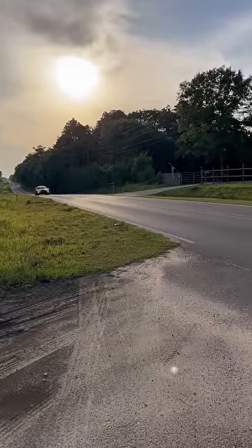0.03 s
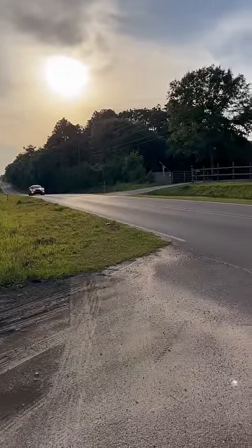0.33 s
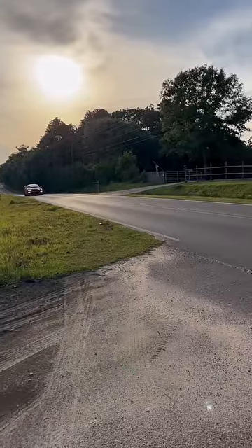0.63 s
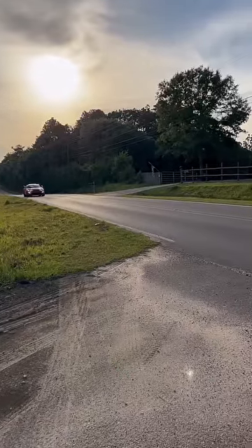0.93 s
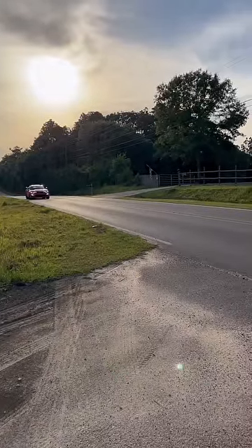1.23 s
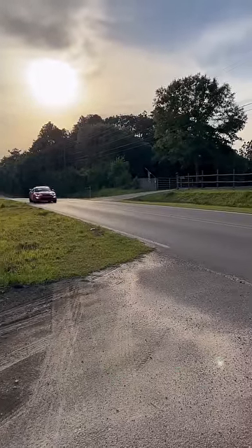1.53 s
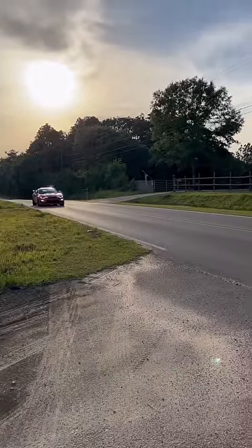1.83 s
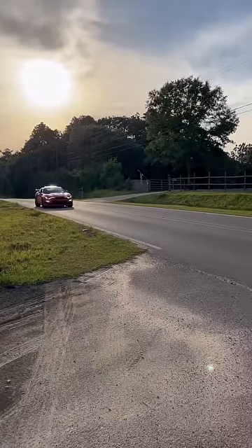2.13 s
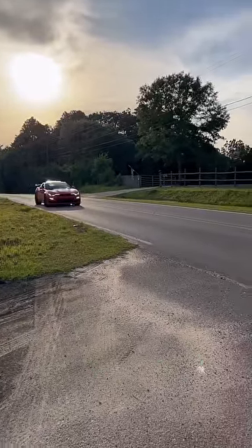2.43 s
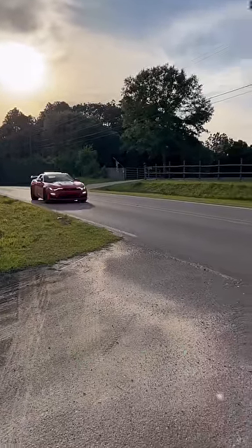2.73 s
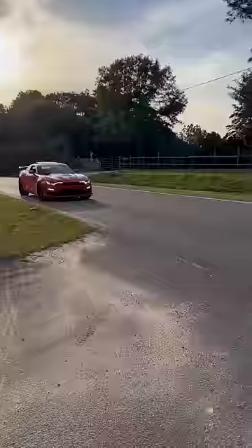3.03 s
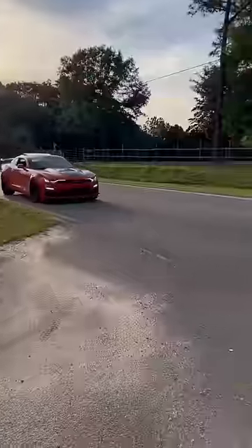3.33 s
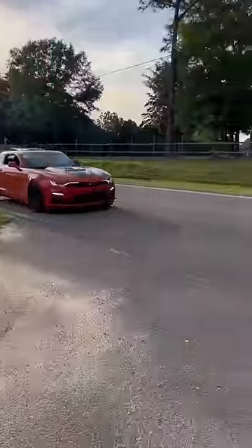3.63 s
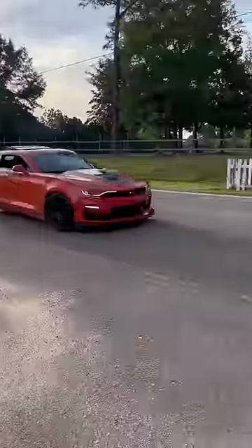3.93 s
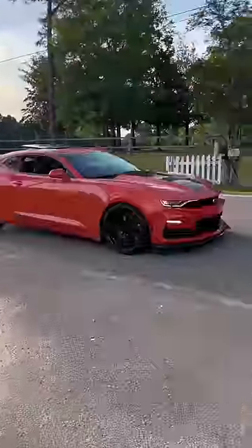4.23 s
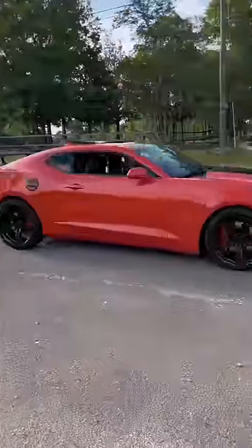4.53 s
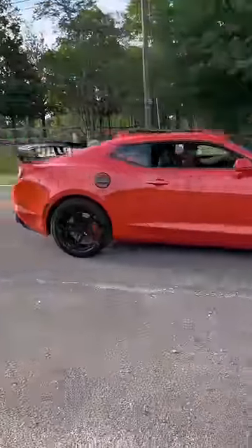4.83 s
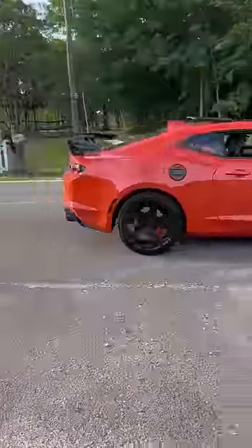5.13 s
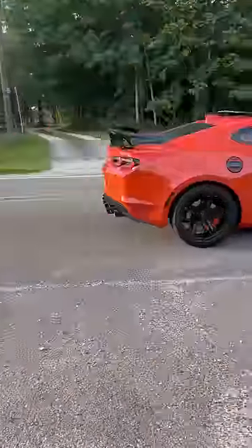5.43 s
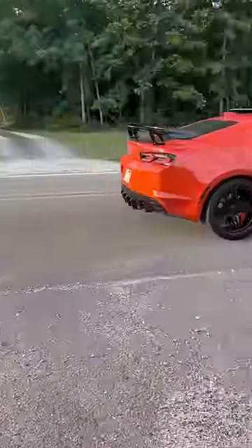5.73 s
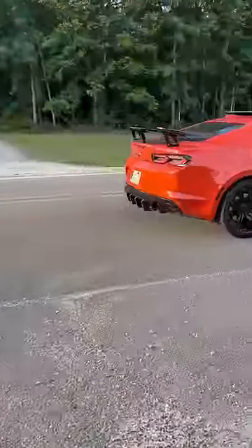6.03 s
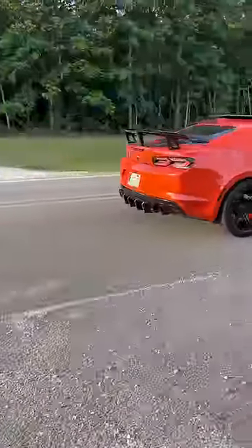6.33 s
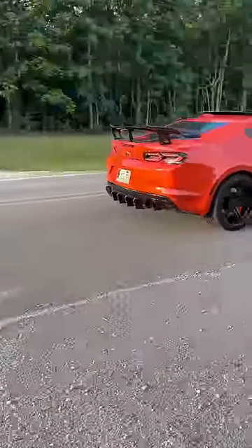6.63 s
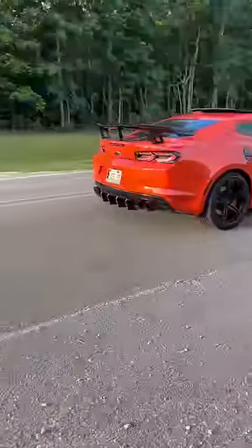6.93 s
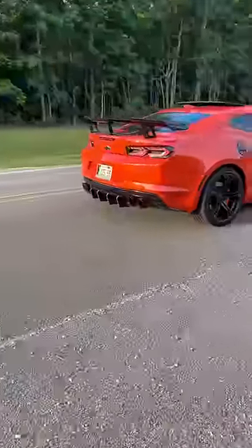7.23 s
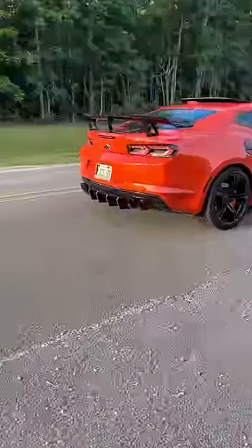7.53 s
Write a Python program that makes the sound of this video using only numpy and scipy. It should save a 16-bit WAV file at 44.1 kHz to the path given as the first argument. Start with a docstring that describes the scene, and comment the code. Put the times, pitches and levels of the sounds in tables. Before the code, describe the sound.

A V8 sports car approaches on a quiet country road, heard in stereo from the verge. At about 0.5 seconds the throttle blips and the pitch rises, then falls slowly while the exhaust rumbles, popping near 1.3 and 1.9 seconds. Tyre roar and hiss grow as it nears. At 3.4 seconds, closest to the microphone, a second blip fires with a loud exhaust bang and a raspy snarl, the loudest moment. The car passes from slightly left to slightly right, burbling unevenly, with a smaller pop near 4 seconds and a brief thin belt whine around 4.6 to 5 seconds. Another pop and a stone tick come at 5.4 seconds. The car rolls away, growing quieter and sinking to a low, lumpy idle by 6.5 seconds. From about 7 seconds, grit crunches softly and a few stones tick under the slow tyres. Trees return a faint echo of the exhaust.

```python
"""A quiet country road, a stereo microphone at the verge. A V8 sports car approaches nose on, tyres
roaring and sizzling, and blips its throttle at 0.5 s; fuel then burns late in the pipes and rumbles.
At 3.4 s, closest to the microphone, a second blip bangs and the tailpipes come into view. The uneven
pulses of the two banks burble, and the trees return a faint echo. From 5 s the car rolls away,
sinking to idle, and by 7 s grit crunches and a few stones tick under the slow tyres."""
import sys
import numpy as np
from scipy import signal
from scipy.fft import rfft, irfft
from scipy.io import wavfile
from scipy.ndimage import uniform_filter1d, minimum_filter1d, map_coordinates

SR = 44100
rng = np.random.default_rng(int(sys.argv[2]) if len(sys.argv) > 2 else 0)


def unload_audio(sound):
    """Save the sound as a 16-bit wav file, at the path given as the first command line argument."""
    columns = np.transpose(np.atleast_2d(sound))
    # keep every value between -1 and 1, then stretch to whole-number steps
    steps = np.round(np.clip(columns, -1, 1) * 32767)
    wavfile.write(sys.argv[1], SR, steps.astype(np.int16))


N = 334719
TIME, FREQS = np.arange(N) / SR, np.fft.rfftfreq(N, 1 / SR)


def gain_of(db):
    """Decibels to gain."""
    return 10 ** (np.asarray(db) / 20)


def unit_rms(x):
    """Scales to an rms of 1."""
    return x / np.sqrt(np.mean(x ** 2) + 1e-20)


def curves(rows, at=TIME):
    """A table's columns interpolated along its first, by default over time."""
    axis, *columns = np.transpose(rows)
    return [np.interp(at, axis, column) for column in columns]


def spectrum_at(points, hz):
    """A spectrum read on a log-frequency axis."""
    freqs, values = np.transpose(points)
    return np.interp(np.log(hz + 1), np.log(freqs + 1), values)


def coloured(x, spectrum):
    """Minimum-phase filter, so that each pulse rings after it lands."""
    log_gain = np.log(gain_of(spectrum_at(spectrum, abs(np.fft.fftfreq(8192, 1 / SR)))))
    ring = np.fft.ifft(np.exp(np.conj(signal.hilbert(log_gain)))).real[:4096]
    return signal.fftconvolve(x, ring)[:N]


def resonant(x, hz, width_hz):
    """Two passes through one resonance, at an rms of 1."""
    band = signal.iirpeak(hz, hz / width_hz, fs=SR)
    return unit_rms(signal.lfilter(*band, signal.lfilter(*band, x)))


def decaying(x, decay_s):
    """Gives each click an exponential tail."""
    return signal.lfilter([1], [1, -np.exp(-1 / (decay_s * SR))], x)


def wander(hz):
    """Random drift of rms 1, up to about the given rate."""
    return unit_rms(irfft(rfft(rng.standard_normal(N)) / (1 + (FREQS / hz) ** 4), N))


def steadied(x, band_hz, window):
    """Holds the running rms of one band at 1."""
    band = signal.sosfilt(signal.butter(4, band_hz, "band", fs=SR, output="sos"), x)
    power = uniform_filter1d(uniform_filter1d(band ** 2, window), window)
    return x / np.sqrt(abs(power) + 1e-14)


def spell(start, length, rise_s, fall_s):
    """Attack, hold and release, from 0 to 1."""
    return np.clip(np.minimum((TIME - start) / rise_s, 1 + (start + length - TIME) / fall_s), 0, 1)


# The tailpipes turning toward the microphone: (time [s], share heard from behind [0-1])
REAR_VIEW = [(0, 0.065), (2.2, 0.08), (2.8, 0.3), (3.25, 0.62), (3.45, 0.87), (5, 0.86)]
def rear_view():
    """How openly the exhaust faces the verge."""
    return curves(REAR_VIEW)[0]


# The car's distance, heard as loudness: (time [s], level against the closest point [dB])
NEARNESS = [(0, -8.5), (0.7, -7), (1, -3.5), (2, -2), (3.3, 0), (5, -1), (5.8, -2.5), (7.59, -6.5)]
def nearness_db():
    """The exhaust grows as the car nears and fades as it leaves."""
    return curves(NEARNESS)[0]


# The car's direction from the microphone: (time [s], left lead at a spread of 1 [samples])
BEARING = [(0, 3), (1, 3), (4.1, 3), (4.7, -2.5), (6.8, -3), (7.59, -1.5)]
def stereo_noise(spectrum, envelope, likeness, spread):
    """Noise at the two microphone ports: partly shared, with a delay, and partly separate."""
    shared, left, right = (unit_rms(coloured(envelope * rng.standard_normal(N), spectrum))
                           for _ in range(3))
    lag = spread * curves(BEARING)[0]
    delayed = map_coordinates(shared, [np.arange(N) - lag], order=3, mode="nearest")
    pair = np.sqrt(likeness) * np.array([shared, delayed])
    pair += np.sqrt(1 - likeness) * np.array([left, right])
    return pair / np.std(pair.mean(0))


def tree_echo(x, t60=0.12, delay_s=.05, taps_per_s=900):
    """Scattered echoes from the trunks along the road."""
    t = np.arange(SR) / SR
    taps = rng.standard_normal(SR) * (rng.random(SR) < taps_per_s / SR)
    taps *= gain_of(-60 * t / t60) * (t > delay_s)
    return signal.fftconvolve(x, taps / np.linalg.norm(taps))[:N]


# Loose grit under the slow tyres, down the road: (time [s], level [dB])
GRAVEL = [(6.3, -73), (6.85, -72), (7.1, -68), (7.3, -67.5), (7.59, -59)]
def gravel(per_s=90, crunch_s=0.0028):
    """Small stones give way one by one, each with a short, dry crunch."""
    hits = (rng.random(N) < per_s / SR) * rng.uniform(.2, 1, N)
    bursts = decaying(hits, crunch_s) * rng.standard_normal(N)
    return gain_of(curves(GRAVEL)[0]) * resonant(bursts, hz=1750, width_hz=900)


# Single stones past the microphone: (time [s], relative level [dB], ring [Hz], width [Hz], t60 [s])
STONES = [(5.379, -29, 3527, 1401, .025), (7.085, -37, 1600, 520, 0.05), (7.334, -41, 1700, 750, 0.022),
          (7.412, -45, 6487, 6004, 0.063), (7.423, -40, 2004, 1000, 0.075), (7.435, -43, 5500, 6000, 0.05),
          (7.452, -42, 4500, 5003, .05), (7.466, -35, 3203, 1988, .015), (7.514, -27, 1970, 380.8, 0.0424),
          (7.567, -20, 2500, 1050, 0.014)]
def stones(snap_db=-27, rise_s=0.0019, stereo_width=0.73):
    """Each stone gives a dry snap with a short ring; wide rings are scrapes of grit."""
    out, t = np.zeros((2, N)), np.arange(SR // 4) / SR
    for start, db, hz, width, t60 in STONES:
        mid, side = rng.standard_normal((2, len(t)))
        noise = mid + stereo_width * np.array([side, -side])
        envelope = .5 * gain_of(db - 60 * t / t60) * (1 - np.exp(-t / rise_s))
        tick = envelope * (resonant(noise, hz, width) + gain_of(snap_db) * noise)
        slot = out[:, round(start * SR):][:, :len(t)]
        slot += tick[:, :slot.shape[1]]
    return out


# The belt, clearest just after the pass: (time [s], pitch [Hz], level [dB])
BELT = [(.75, 1600, -76), (1.0, 1598, -57.5), (2.4, 1762, -62.5), (2.9, 1789, -59), (4.3, 1785, -65),
        (4.6, 1869, -47), (4.75, 1944, -52), (4.9, 1875, -52), (5.1, 1757, -71)]
def belt_whine(fuzz_hz=50):
    """A narrow, fuzzy tone from the belt drive."""
    hz, db = curves(BELT)
    phase = 2 * np.pi * np.cumsum(hz) / SR
    return gain_of(db) * (wander(fuzz_hz) * np.cos(phase) + wander(fuzz_hz) * np.sin(phase))


# The grille, head on: (centre [Hz], width [Hz], level against the capped whirr [dB])
GRILLE = [(3370, 320, -3.5), (4250, 200, -10.5)]
def grille_hiss(cap_db=-52):
    """Air hisses in two narrow resonances that fade as the nose passes the microphone."""
    level = gain_of(np.minimum(curves(RUSH)[1], cap_db)) * (1 - rear_view())
    air = rfft(rng.standard_normal(N) + .5 * rng.standard_normal((2, N)))
    return level * sum(gain_of(db) * unit_rms(irfft(air / (1 + (2 * (FREQS - hz) / width) ** 2), N))
                       for hz, width, db in GRILLE)


# The path off the asphalt to the microphone: (time [s], delay behind the direct sound [s])
BOUNCE = [(3.4, 0.001125), (4.5, 0.0011), (5, 0.0013), (5.6, 0.001613), (6.5, 0.0015)]
def road_bounce(pair, strength=0.14):
    """The road mirrors the nearby car: a comb that slides down as it passes."""
    share = strength * rear_view()
    mirrored = np.array([np.interp(TIME - curves(BOUNCE)[0], TIME, side) for side in pair])
    return (pair + share * mirrored) / np.sqrt(1 + share ** 2)


# Base levels of the rush at the verge: (time [s], roar [dB], whirr [dB], sizzle [dB])
RUSH = [(0, -47, -62.5, -86), (0.4, -49, -66.5, -80), (1.0, -45.5, -56, -65), (2.2, -41.5, -53, -64),
        (3.1, -39.5, -51, -61), (3.6, -35, -49, -58), (4.6, -36, -49, -54.5), (5.3, -41, -53, -60.5),
        (5.9, -44, -60, -67.5), (6.8, -52, -64, -76), (7.59, -50.5, -63.5, -73.5)]
def rush_gains(rasp_treble_db=-11.5):
    """Gains of roar, whirr and sizzle: the rasp of late burns adds to the first two."""
    roar, whirr, sizzle = gain_of(curves(RUSH))
    rasp = burn_gains()[2]
    return np.hypot(roar, rasp), np.hypot(whirr, gain_of(rasp_treble_db) * rasp), sizzle


# Colours of gas and tyres, engine bay and tread: (frequency [Hz], relative level [dB])
ROAR = [(60, -7), (300, -1), (550, 4), (700, -6.5), (920, 1), (1200, -4), (1800, -9), (2200, -18),
        (3200, -36), (6000, -68)]
WHIRR = [(1400, -15), (2200, 3), (2700, 3.5), (3050, 2.5), (3400, 1), (3800, -3), (4250, 0), (5000, -6),
         (5600, -33.5), (8000, -44.5)]
SIZZLE = [(4000, -25), (5600, -11.5), (6500, 4.5), (7700, 3.5), (9200, 0.5), (10300, -24.5), (11500, 1),
          (13000, -2), (14300, 1), (15500, -22.5)]
def rush(clicks, puff_s=.007, grit_db=1.5, trim_db=-1):
    """Gas puffs out with each firing, the engine bay whirrs, and the tread snaps off the asphalt."""
    roar, whirr, sizzle = rush_gains()
    puffs = unit_rms(decaying(clicks, puff_s))
    grit = gain_of(grit_db * np.repeat(rng.exponential(1, N), 16)[:N])  # grains of 16 samples
    roar *= gain_of(trim_db + .6 * wander(6))
    out = roar * stereo_noise(ROAR, 0.61 + 0.46 * puffs, likeness=0.92, spread=1)
    whirr *= gain_of(trim_db + .5 * wander(29))
    out += whirr * stereo_noise(WHIRR, (1 + 0.38 * puffs) * np.sqrt(grit), likeness=0.28, spread=0.73)
    sizzle *= gain_of(.5 * wander(15))
    return out + sizzle * stereo_noise(SIZZLE, grit, likeness=0.29, spread=0.32)


def intake_gasp(at_s=3.348, width_s=0.021, level_db=-38):
    """The intake gulps air just before the second blip fires."""
    swell = gain_of(level_db) * np.exp(-((TIME - at_s) / width_s) ** 2)
    return swell * stereo_noise(WHIRR, 1, likeness=1, spread=0.98)


# The engine running down along the road, lifted twice by the throttle: (time [s], firing rate [Hz])
FIRING_RATE = [(0, 230.5), (0.2, 224.5), (0.48, 216.7), (0.97, 273.6), (1.5, 252.5), (2.0, 235.7),
               (2.6, 206.2), (3.3, 167), (3.38, 167.4), (3.61, 227.5), (3.76, 233.1), (4.0, 207),
               (4.25, 190.2), (4.55, 162.9), (5.0, 128.8), (5.4, 97.53), (6.0, 66.07), (6.5, 52.2),
               (7.0, 45.05), (7.59, 41.61)]
def crank(waver=.002):
    """The slightly wavering firing rate and the running count of firings."""
    hz = curves(FIRING_RATE)[0] * (1 + waver * wander(21))
    return hz, np.cumsum(hz) / SR


# The V8 in firing order: (strength [gain], lateness [firing gaps], bank [0 or 1])
CYLINDERS = [(1.6, 0, 0), (0.76, .05, 1), (1.4, -.03, 1), (0.94, -0.045, 0), (1.03, 0.03, 1),
             (0.94, .05, 0), (0.54, 0.00022, 0), (1.37, -0.06, 1)]
def firings(count, uneven, jitter):
    """One click per firing, for each bank: cylinders differ, and no two burns are alike."""
    number = np.arange(1, int(count[-1]))
    strength, late, bank = np.array(CYLINDERS)[number % len(CYLINDERS)].T
    size_draw, time_draw = rng.standard_normal((len(number), 2)).T
    at = np.searchsorted(count, number + late + jitter * time_draw).clip(0, N - 1)
    size = strength * np.exp(uneven * size_draw - uneven ** 2 / 2)
    return np.array([np.bincount(at, size * (np.round(bank) == side), N) for side in (0, 1)])


def idle_chuff(count, level_db=-57, sharpness=1.5):
    """Near idle a hollow chuff comes once per turn of the crankshaft."""
    crank_turns = count / (len(CYLINDERS) / 2)
    beat = np.exp(sharpness * np.cos(2 * np.pi * crank_turns))
    hollow = resonant(beat * rng.standard_normal(N), hz=780, width_hz=190)
    idling = np.interp(curves(FIRING_RATE)[0], [48, 62], [1, 0])
    return gain_of(level_db) * hollow * idling


# The open exhaust from behind: (order [per engine cycle], level against the roar [dB])
SNARL = [(20, -10.5), (22, -12.5), (24, -12), (26, -18.5), (28, -17.5), (30, -17.5), (32, -16), (34, -16),
         (38, -15), (40, -13)]
def snarl(hz, count, shake=0.5):
    """High engine orders rasp when the revs are up and the tailpipes face the microphone."""
    cycle = 2 * np.pi * count / len(CYLINDERS)
    orders = sum(gain_of(db) * np.cos(round(k) * cycle) * (1 + shake * wander(9.8)) for k, db in SNARL)
    revving = np.interp(hz, [110, 170], [0, 1])
    return np.sqrt(2) * rush_gains()[0] * rear_view() * revving * orders


# Fuel burning late in the pipes: (start [s], length [s], rumble [dB], harder pulses [dB], rasp [dB])
BURNS = [(1.04, 0.26, -18, -34.5, -51.5), (1.297, 0.3, -16, -24.5, -38), (1.603, 0.3, -16, -27.5, -38),
         (3.305, 0.045, -19, -26.5, -35), (3.37, 0.35, -26.5, -27.5, -37.5),
         (3.897, 0.15, -14.5, -23, -42.5), (4.269, 0.068, -23.5, -19, -46),
         (4.413, 0.08, -25, -15.5, -46.5), (4.676, 0.24, -27, -23, -53), (5.02, 0.05, -26.5, -35, -50),
         (5.453, 0.037, -23, -22, -51), (6.798, 0.79, -34, -39, -63)]
def burn_gains(catch_s=0.045, die_s=0.055):
    """Gains of rumble, harder pulses and rasp: each spell catches quickly and dies away."""
    return sum(np.outer(gain_of(dbs), spell(start, length, catch_s, die_s))
               for start, length, *dbs in BURNS)


# Colour of the burning fuel: (frequency [Hz], relative level [dB])
RUMBLE = [(25, -41.5), (45, -14), (65, -9.5), (90, 3.5), (130, -3), (180, 5.5), (230, -6.5), (350, -6),
          (410, -29), (700, -41.5), (2000, -81)]
def late_burns(per_s=700, smoulder_db=-33.5):
    """Fuel goes off at random moments in the pipe: a deep, lumpy rumble."""
    pops = (rng.random(N) < per_s / SR) * rng.uniform(0.42, 1, N)
    thuds = steadied(coloured(pops - pops.mean(), RUMBLE), band_hz=[45, 230], window=2000)
    return np.hypot(burn_gains()[0], gain_of(smoulder_db + nearness_db())) * thuds


# Standing waves of a pipe at a tuning of 1: (frequency [Hz], width [Hz], relative level [dB])
PIPE_MODES = [(139.5, 35, -1.5), (160.4, 26, -6), (245.8, 29, 1), (319.2, 28.4, 4.5), (362.6, 18.3, 4),
              (414.5, 22.7, -1.5), (470.6, 26, -6.5), (627, 150, -9), (815, 35, -2.5), (1040, 23, -19)]
# Colour of the tailpipes from behind: (frequency [Hz], relative level [dB])
PIPE_COLOUR = [(35, -22), (70, -8.5), (115, 3.5), (470, 5), (560, -18.5), (700, -18), (850, -17.5),
               (1100, -29), (2000, -30), (5000, -59)]
def tailpipe(push, tuning=1):
    """A push rings the standing waves of one pipe; neighbours answer with opposite sign."""
    t = np.arange(SR // 5) / SR
    ring = np.zeros(len(t))
    for k, (hz, width, db) in enumerate(PIPE_MODES):
        decay = gain_of(db) * width * np.exp(-np.pi * width * t)
        ring += (-1) ** k * decay * np.cos(2 * np.pi * hz * tuning * t)
    return coloured(signal.fftconvolve(push, ring)[:N], PIPE_COLOUR)


# Single hard burns, the loudest right by the microphone: (time [s], peak [dB])
BANGS = [(1.268, -15.5), (1.923, -17), (3.378, -2), (3.955, -19.5), (5.399, -14.5)]
def bangs():
    """A pocket of fuel goes off and rings the whole pipe."""
    push = np.zeros(N)
    for start, db in BANGS:
        push[round(start * SR)] = gain_of(db)
    ring = tailpipe(push)
    return ring * push.max() / abs(ring).max()


# Throttle blips, one up the road and one close by: (start [s], length [s], strength [dB])
BLIPS = [(0.457, 0.59, -6), (3.368, 0.34, 0.5)]
def throttled(shut_db, open_db, bark_db=5, bark_s=0.1, open_s=0.015, shut_s=0.11):
    """A level in dB that follows throttle and distance; the bark lifts a blip's first firings."""
    db = shut_db
    for start, length, strength_db in BLIPS:
        opening = spell(start, length, open_s, shut_s)
        kick_db = bark_db * np.exp(-np.maximum(TIME - start - open_s, 0) / bark_s)
        db = db + opening * (open_db + strength_db + kick_db - db)
    return db + nearness_db()


# The exhaust close behind, throttle shut, as its orders sweep through the pipes' resonances:
# (firing rate [Hz], firing tone [dB], octave [dB], burble [dB], pulses [dB])
COASTING = [(44, -34, -16.5, -61, -21.5), (53.5, -29.5, -21, -57, -22.5), (60.8, -24.5, -23.5, -58, -19),
            (72, -28.5, -30.5, -42, -24), (98, -21.5, -31, -23, -19.5), (140, -19.5, -17.5, -17.5, -20),
            (143.6, -20.5, -28.5, -21.5, -19.5), (164.17, -14, -17, -23, -21),
            (189.8, -14, -27.5, -24.5, -20.5), (207, -23, -30.5, -24, -21.5), (225, -32, -31, -22.5, -21)]
def exhaust_gains(hz, misfire_db=-8, full_burn_db=-17):
    """Gains of tone, octave, burble and pulses; late burns weaken the tones and harden the pulses."""
    tone_db, octave_db, burble_db, pulse_db = curves(COASTING, at=hz)
    rumble, harder, _ = burn_gains()
    lost_db = misfire_db * np.minimum(rumble / gain_of(full_burn_db), 1) ** 2
    front = 1 - rear_view()  # head on, the car's body changes the balance
    tone = gain_of(throttled(tone_db, open_db=-16.5) + lost_db)
    octave = gain_of(throttled(octave_db, open_db=-19, bark_db=8.5) - 26 * front + lost_db)
    burble = gain_of(throttled(burble_db, open_db=-32.5, bark_db=0) + 3 * front + lost_db)
    pulses = gain_of(throttled(pulse_db - 17.5 * front, open_db=-22))
    return tone, octave, burble, np.hypot(pulses, harder)


# The exhaust with the microphone ahead of the car: (frequency [Hz], level against behind [dB])
BODY_SHADOW = [(200, 0.5), (350, -7.5), (420, -14), (500, -8), (620, -17.5), (900, -7.5)]
def exhaust_pulses(banks, hz, count, turbulence=0.57, gush_s=0.0097, flicker_db=0.9):
    """Every firing sends a push and a turbulent gush down its bank's pipe."""
    # the mean and the two lowest harmonics are taken out: the boom carries those tones
    lowest = .5 * hz / SR * (1 + 2 * np.cos(2 * np.pi * count) + 2 * np.cos(4 * np.pi * count))
    gush_power = (1 - np.exp(-1 / (gush_s * SR))) * decaying(banks ** 2, gush_s)
    gush = np.sqrt(gush_power) * rng.standard_normal((2, N))
    push = banks - lowest + turbulence * gush
    ring = tailpipe(push[0]) + tailpipe(push[1], tuning=1.035)
    rear = rear_view()
    heard = rear * ring + (1 - rear) * coloured(ring, BODY_SHADOW)
    level = exhaust_gains(hz)[3] * gain_of(flicker_db * wander(22))
    return level * steadied(heard, band_hz=[120, 610], window=3600)


# Neighbours of the burble's sixth order: (order [per engine cycle], relative level [dB])
THROB = [(2, -23), (3, -15.5), (4, -11), (5, -7.5), (7, -4), (10, -13.5), (11, -23), (12, -26.5)]
def throb(hz, cycle, level_db=-4, db_per_hz=0.1, full_hz=225):
    """The banks fire unevenly: one throb per engine cycle, smeared by the pipe, weaker at low revs."""
    orders = sum(gain_of(db) * np.cos(round(k) * cycle + .3 * (k - 6) ** 2) * (1 + .25 * wander(6))
                 for k, db in THROB)
    return orders * gain_of(level_db + db_per_hz * np.minimum(hz - full_hz, 0))


# The silencer from behind: (order [per engine cycle], level in tune against the burble [dB])
GURGLE = [(12, -22.5), (13, -18), (14, -9), (15, -3.5), (17, -9.5), (18, -6)]
def gurgle(hz, cycle, centre_hz=300, width_hz=75):
    """Higher orders gurgle while they sweep through the silencer's range."""
    out = np.zeros(N)
    for k, db in GURGLE:
        in_tune = np.exp(-((k * hz / len(CYLINDERS) - centre_hz) / width_hz) ** 2)
        out += gain_of(db) * in_tune * np.sin(round(k) * cycle) * (1 + 0.84 * wander(20))
    return rear_view() * out


def exhaust_boom(hz, count, flutter=0.043, third_db=-8):
    """The lowest orders leave the tailpipes as clean tones, the burble at 6/8 of the firing rate."""
    tone_gain, octave_gain, burble_gain, _ = exhaust_gains(hz)
    phase = 2 * np.pi * count
    cycle = phase / len(CYLINDERS)
    tones = tone_gain * np.cos(phase) * (1 + flutter * wander(33))
    third = gain_of(third_db) * np.interp(hz, [50, 75], [1, 0]) * np.sin(3 * phase)  # only near idle
    tones += octave_gain * (np.cos(2 * phase) + third) * (1 + flutter * wander(25))
    burble = np.cos(6 * cycle) + throb(hz, cycle) + gurgle(hz, cycle)
    return np.sqrt(2) * (tones + burble_gain * burble)


# The exhaust across the microphone: (frequency [Hz], lead of the left port [rad])
PORT_PHASE = [(0, 0), (100, 0), (300, -.19), (480, -.5), (600, -1.1), (850, -.25), (1500, 0)]
def at_ports(exhaust):
    """The exhaust's low mids reach the two ports out of step."""
    lead = np.outer([.5, -.5], spectrum_at(PORT_PHASE, FREQS))
    return irfft(rfft(exhaust) * np.exp(1j * lead), N)


def scene():
    """The pass from the verge: the exhaust and its echo over the rush of the car and the stones."""
    hz, count = crank()
    banks = firings(count, uneven=0.24, jitter=0.011)
    exhaust = exhaust_boom(hz, count) + exhaust_pulses(banks, hz, count) + late_burns() + bangs()
    exhaust = exhaust + gain_of(-19) * tree_echo(exhaust) + idle_chuff(count) + snarl(hz, count)
    car = at_ports(exhaust) + road_bounce(rush(banks.sum(0)))
    return car + intake_gasp() + grille_hiss() + belt_whine() + gravel() + stones()


def limited(x, ceiling=0.87, window=440):
    """A peak limiter dips the gain smoothly around the hardest blows."""
    gain = np.minimum(1, ceiling / (abs(x).max(0) + 1e-9))
    return x * uniform_filter1d(minimum_filter1d(gain, window), window)


# Colour of the microphone's two ports: (frequency [Hz], left minus right [dB])
PORT_BALANCE = [(60, -0.5), (110, 1), (200, 1.5), (380, 5), (700, 3.5), (1290, -1.5), (2380, 3), (4400, -4),
                (8120, 0.5), (15000, -1)]
def record(dry, cutoff_hz=15200):
    """The microphone at the verge: each port's own colour, then a limiter and a low-pass."""
    balance = gain_of(np.outer([.5, -.5], spectrum_at(PORT_BALANCE, FREQS)))
    heard = limited(irfft(rfft(dry) * balance / balance.mean(0), N))
    low_pass = signal.firwin(511, cutoff_hz, window=("kaiser", 9), fs=SR)
    return signal.oaconvolve(heard, low_pass[None], "same")


dry = scene()
out = record(dry)
unload_audio(out)
```